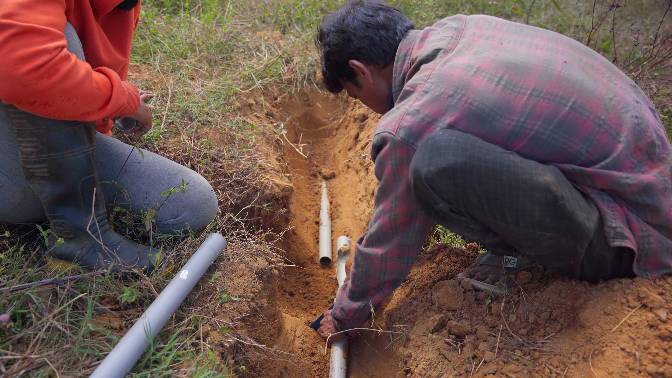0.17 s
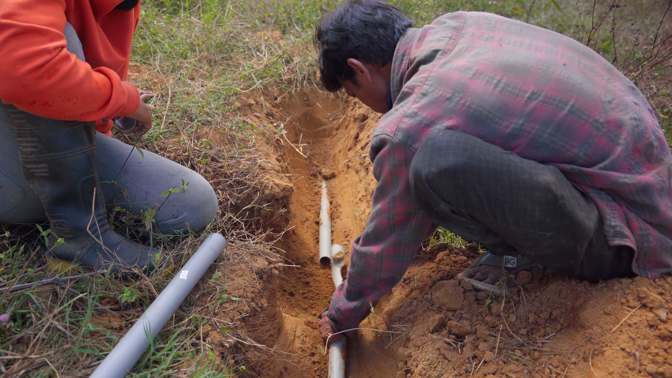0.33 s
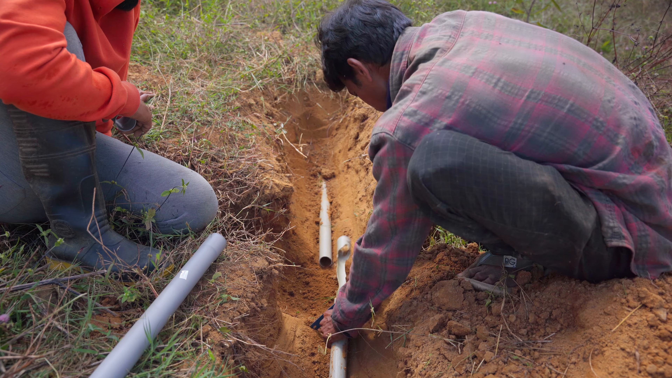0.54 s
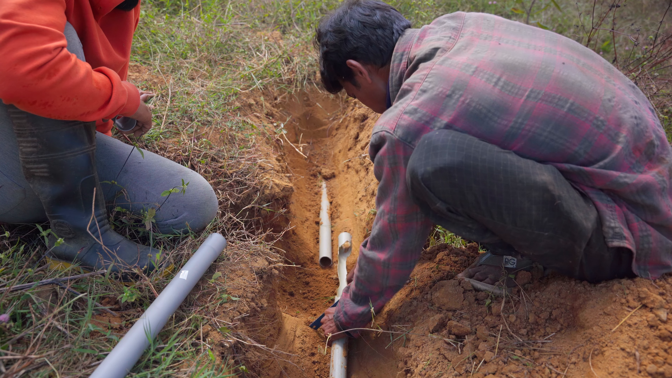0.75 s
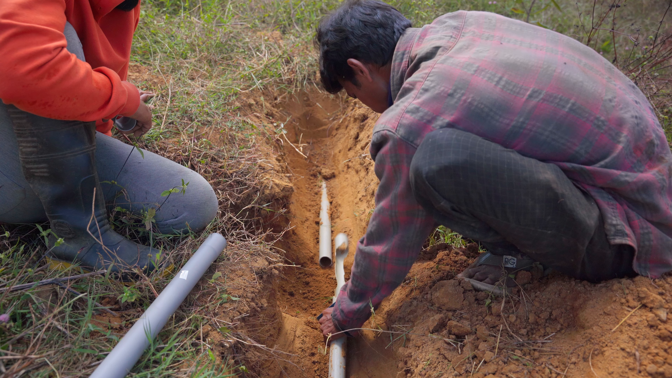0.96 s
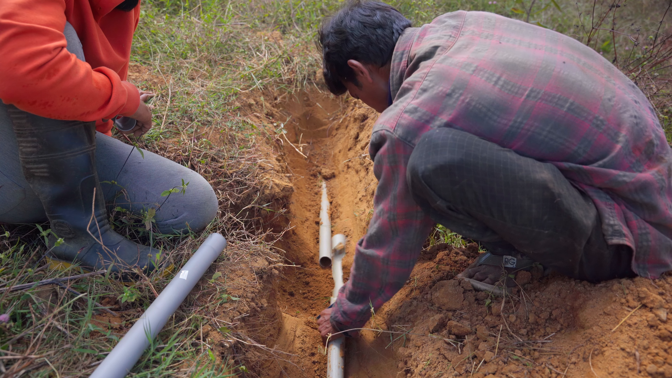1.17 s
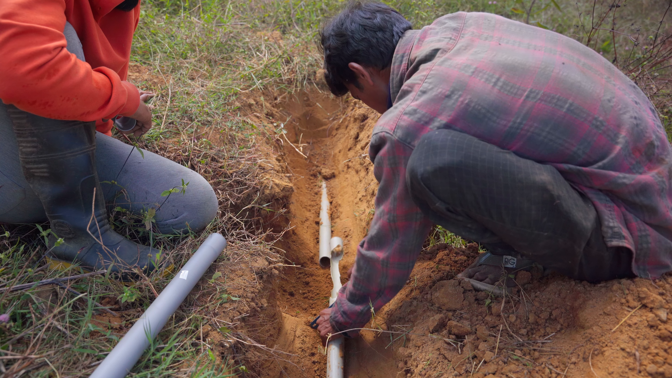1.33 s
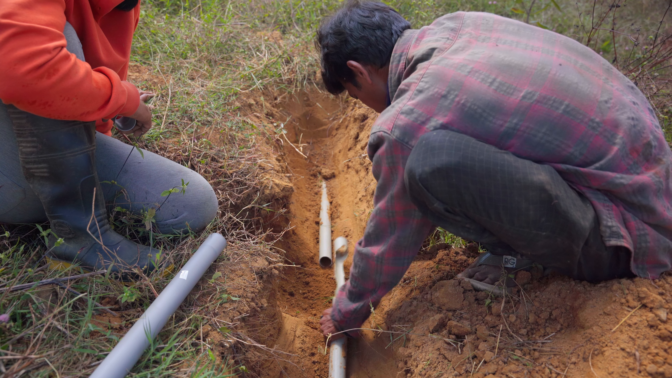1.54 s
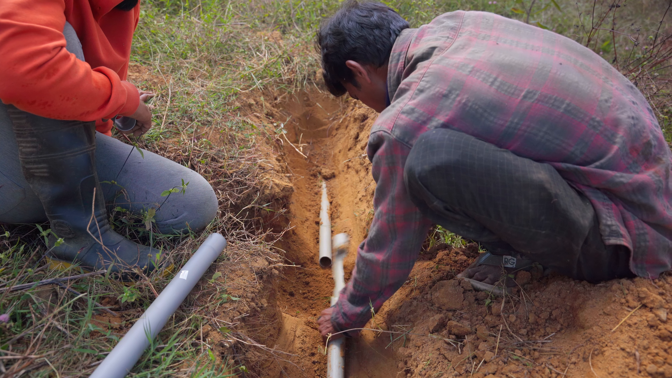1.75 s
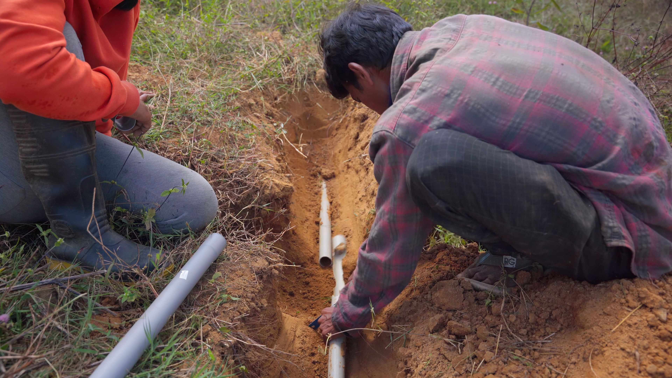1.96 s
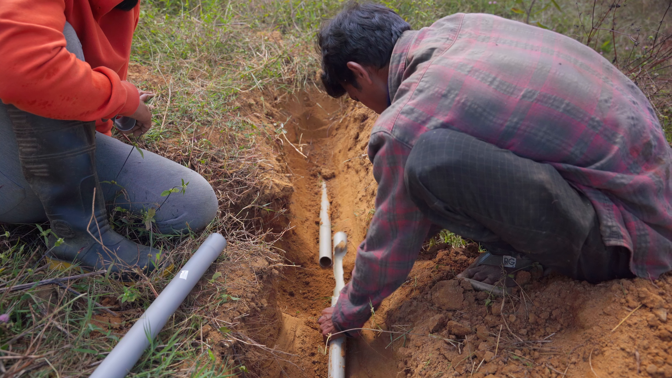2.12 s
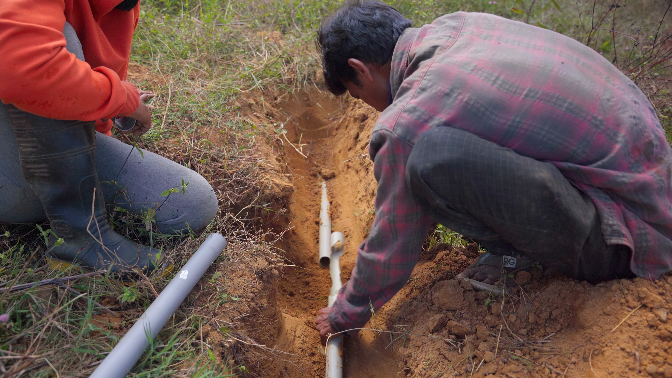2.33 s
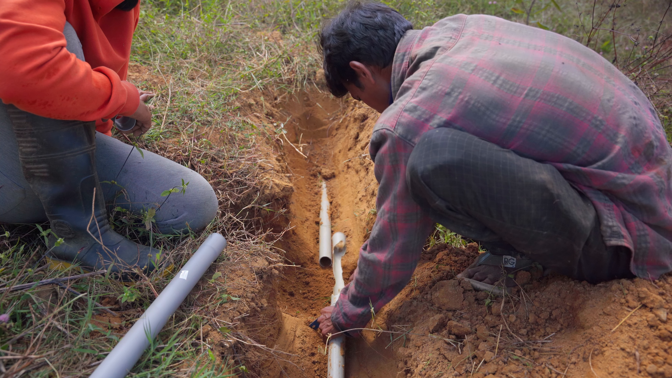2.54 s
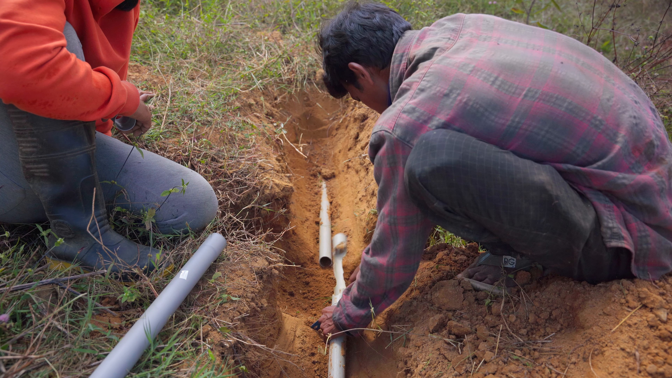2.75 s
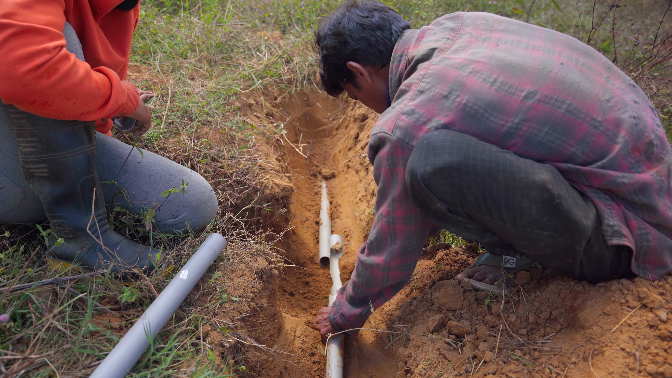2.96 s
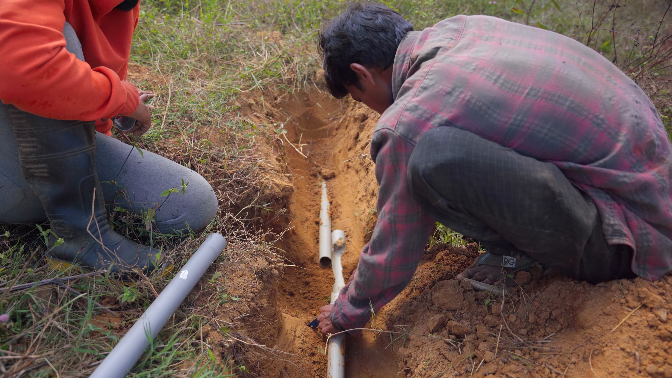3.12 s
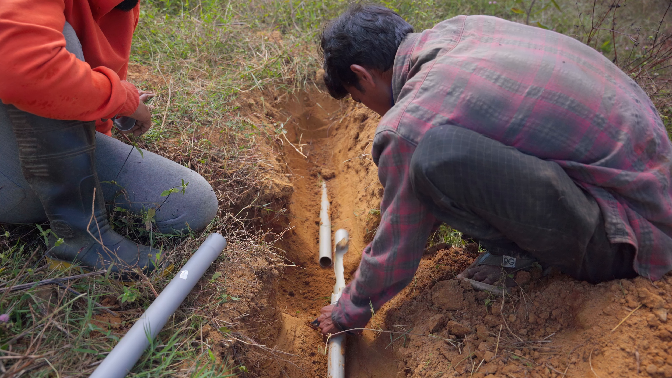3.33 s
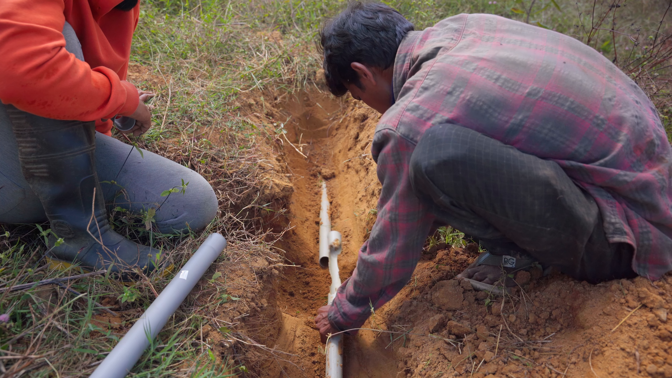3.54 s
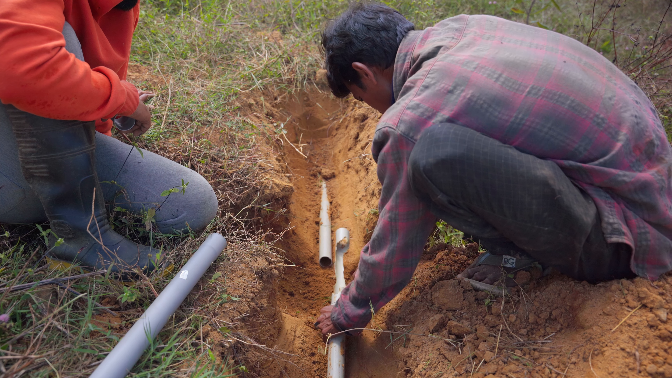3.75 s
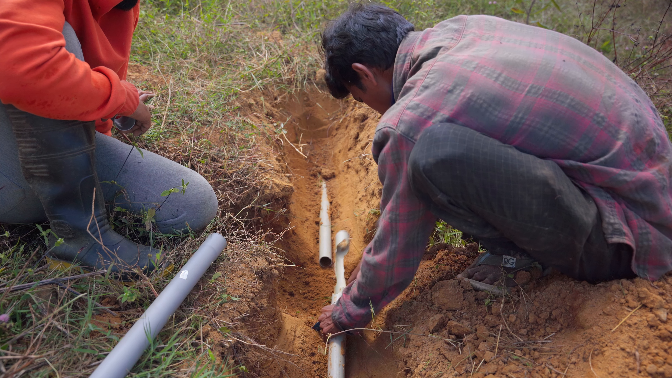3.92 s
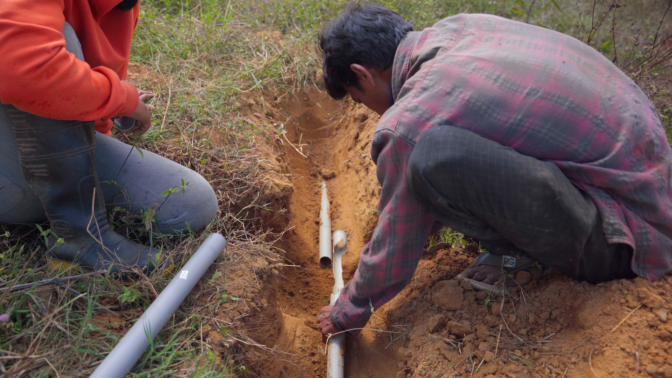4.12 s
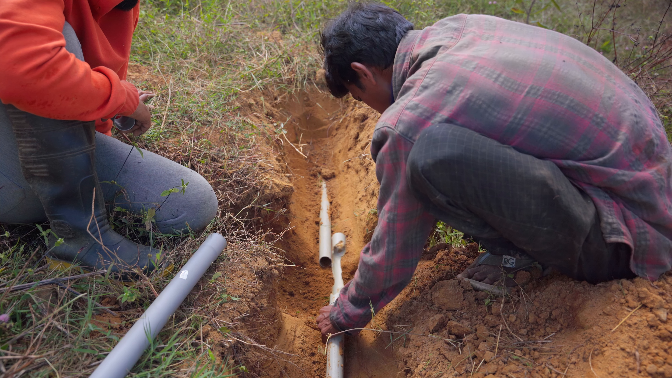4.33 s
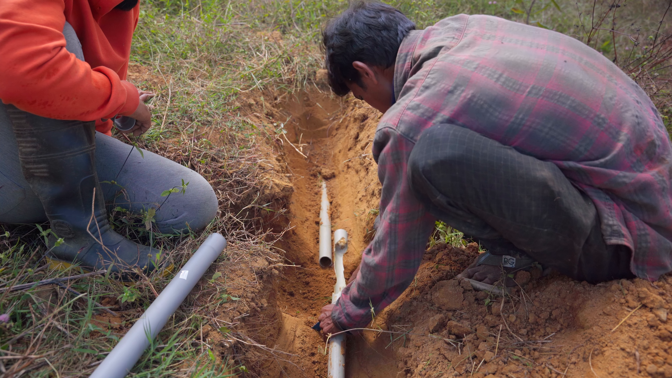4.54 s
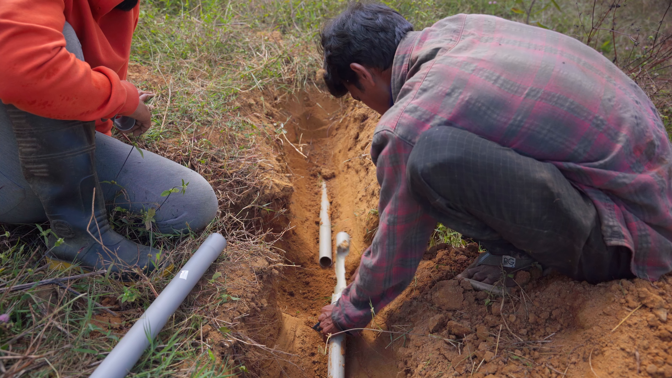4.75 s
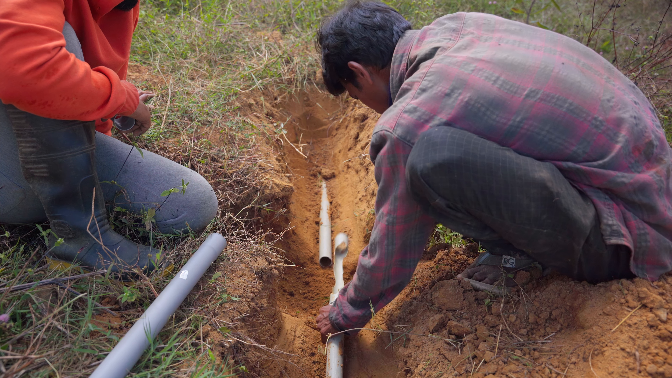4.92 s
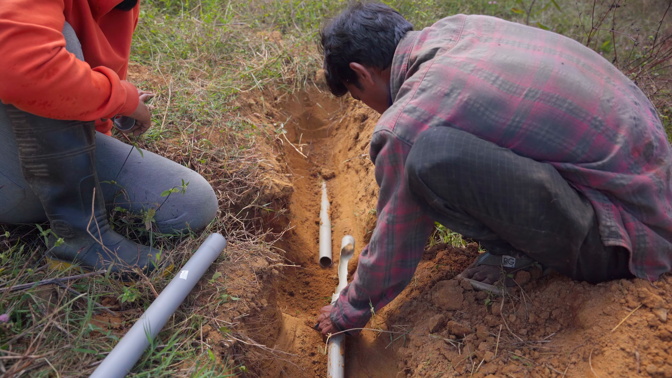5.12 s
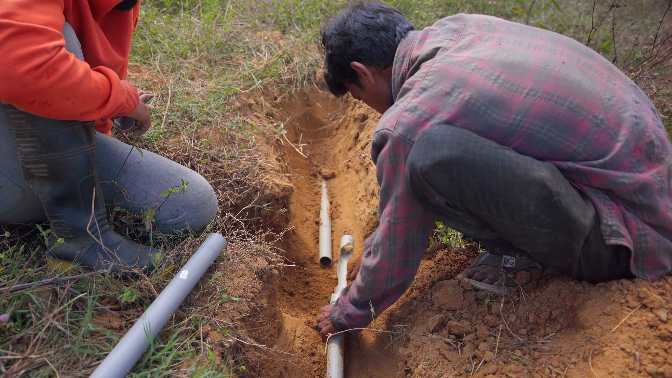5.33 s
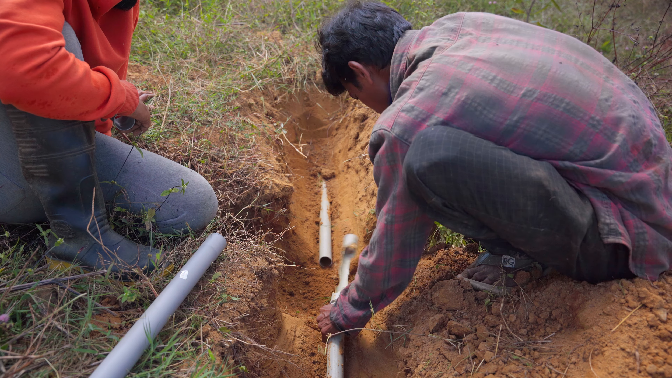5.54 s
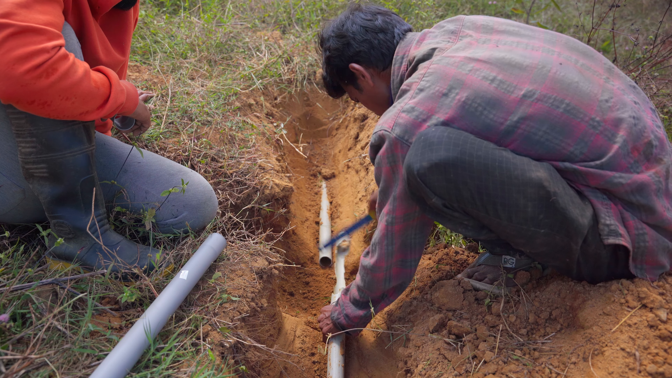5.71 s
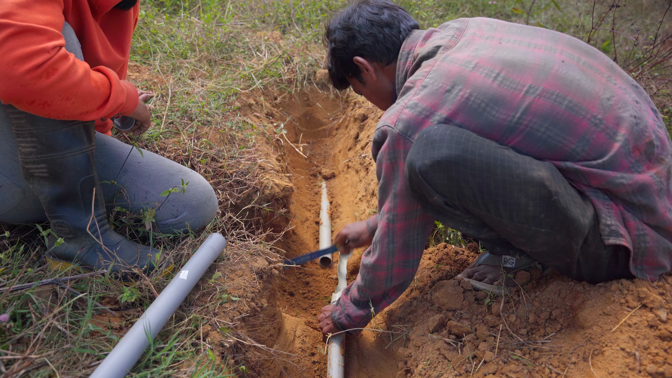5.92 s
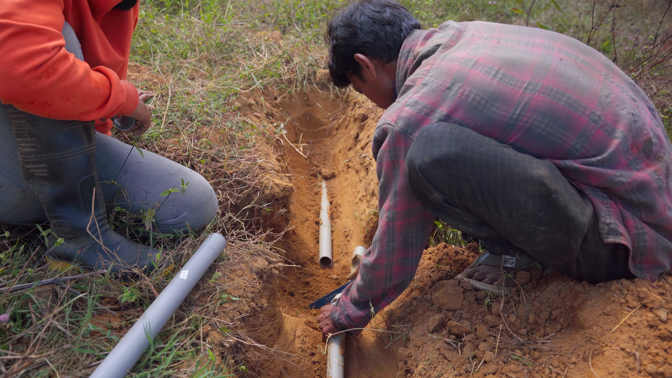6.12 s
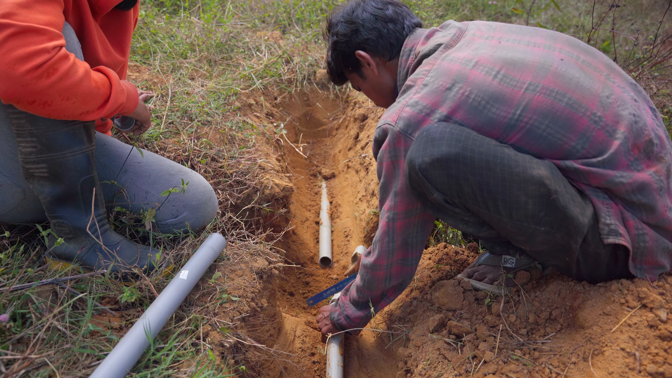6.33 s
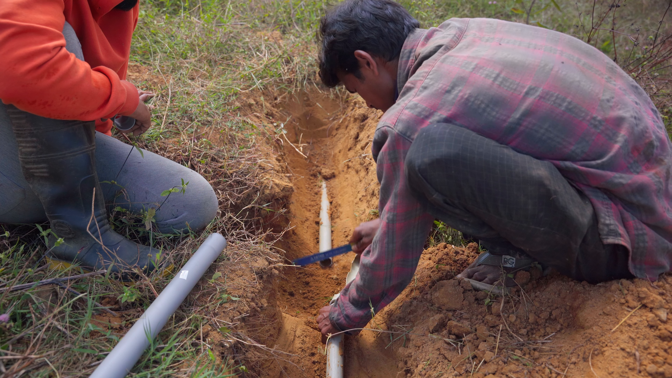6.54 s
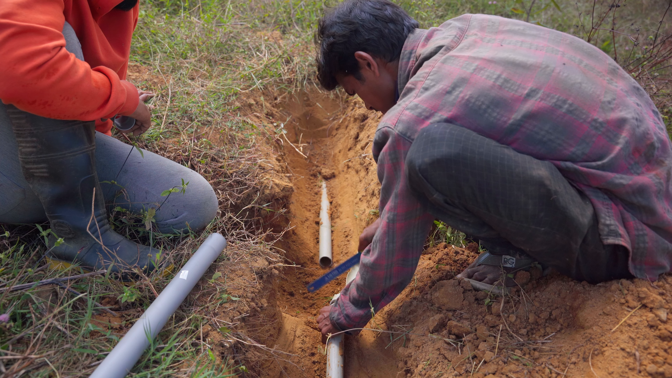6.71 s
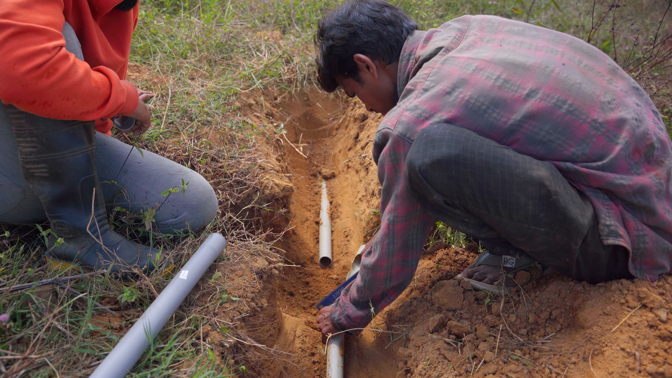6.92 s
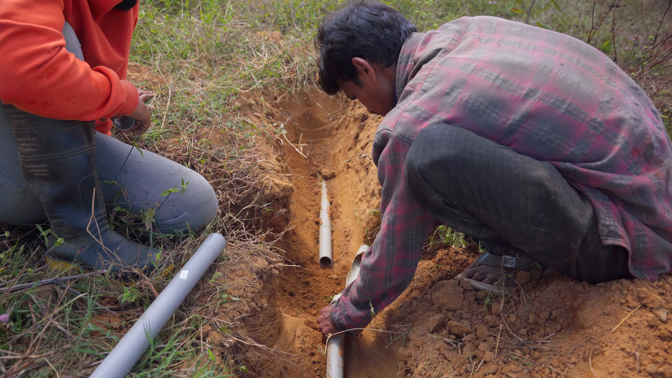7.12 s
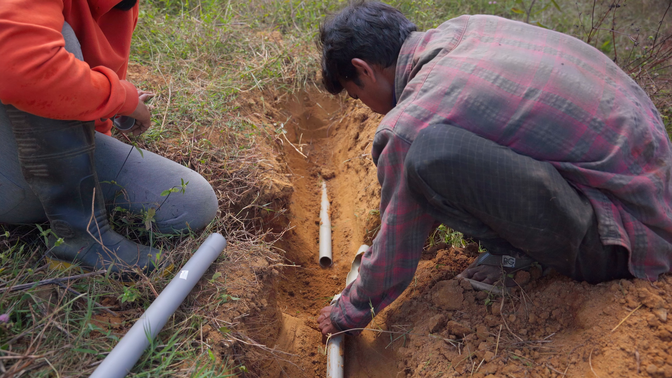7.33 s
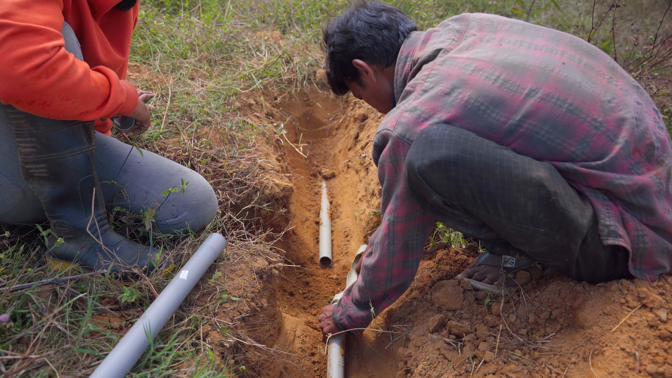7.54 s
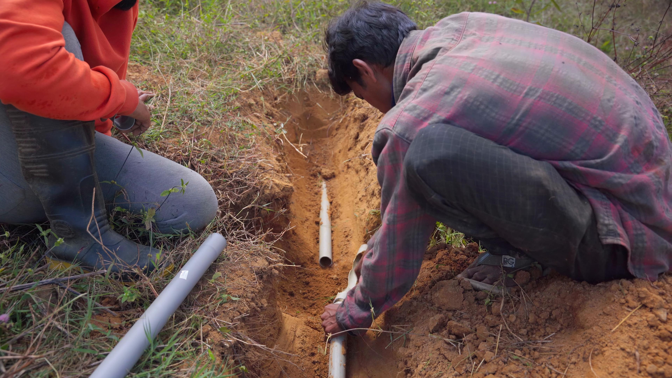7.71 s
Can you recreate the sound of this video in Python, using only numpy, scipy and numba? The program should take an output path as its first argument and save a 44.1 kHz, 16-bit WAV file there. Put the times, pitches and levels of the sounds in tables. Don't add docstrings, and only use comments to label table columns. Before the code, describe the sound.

Outdoors, close to a small camera microphone, a saw blade cuts a thin plastic pipe in brisk back-and-forth strokes, about seven a second counting both directions. Forward strokes are louder, with sharp cracks and snags. The sound begins hollow, grows fuller and ringing, then weakens as the blade comes free. A small knock, a faint bird whistle and light skimming scrapes follow over wind and hiss.

```python
import sys
import numpy as np
from scipy import signal
from scipy.fft import rfft, irfft
from scipy.io import wavfile
from scipy.ndimage import uniform_filter1d
from numba import njit

SR = 44100
rng = np.random.default_rng(int(sys.argv[2]) if len(sys.argv) > 2 else 0)


def gain_from_decibels(decibels):
    exponent = np.asarray(decibels, float) / 20
    return 10 ** exponent


def persist_wave(psi):
    counts = np.round(np.clip(psi, -1, 1) * 32767).astype(np.int16)
    wavfile.write(sys.argv[1], SR, np.atleast_2d(counts).T)


N = 342657
FFT_SIZE = 16384

# hz, level_db_per_hz
HISS_COLOUR = [(100, -16), (170, -1), (244, -9), (296, -7), (815, -14), (1370, -16), (2040, -24),
               (4920, -26.5), (5730, -25.5), (7210, -27), (11200, -28.5), (15200, -16.5), (16400, -32)]
# time_s, level_db
WIND_LEVEL = [(0.0, -54), (0.48, -50), (3.16, -51), (3.27, -53), (3.33, -43), (3.44, -52), (5.17, -53.5),
              (5.78, -47.5), (6.1, -53.5), (6.28, -42), (6.34, -55.5), (6.75, -40.5), (6.9, -47),
              (7.38, -49.5), (7.68, -50), (7.77, -48)]
# hz, level_db_per_hz
WIND_COLOUR = [(8.8, -35.5), (15, -3), (64, 3.5), (116, 3.5), (193, -18), (237, -15), (349, -25.5),
               (400, -21), (520, -70.5), (880, -120)]
# start_s, length_s, first_hz, last_hz, level_db
BIRD_CALLS = [
    (6.805, .018, 6200, 6000, -67),
    (6.835, .05, 5750, 4200, -61),
    (6.875, .035, 4800, 4550, -59),
    (6.885, .022, 11000, 8550, -61),
    (6.2, 0.034, 5400, 5350, -63),
]
# start_s, length_s, centre_hz, width_hz, level_db
RUSTLES = [(6.455, .03, 2240, 4400, -54), (6.27, 0.0235, 7500, 2300, -60.5),
           (0.207, 0.032, 4800, 4500, -46), (1.8, 0.061, 5000, 5000, -52), (0.542, 0.036, 3600, 6400, -47),
           (1.09, .03, 6000, 7000, -44), (1.35, .09, 5000, 7000, -52), (2.53, .06, 5000, 4000, -48),
           (4.0, .04, 5500, 500, -50), (5.53, .05, 5400, 200, -52), (7.245, .02, 5350, 300, -58),
           (1.7, 0.049, 4000, 7300, -46), (2.27, 0.04, 4800, 2640, -51), (6.36, 0.028, 1300, 2400, -50.5),
           (6.53, 0.15, 7600, 1400, -58), (7.4, 0.106, 4000, 900, -64), (4.12, .02, 4570, 460, -22)]
# time_s, peak_db, pitch_hz
GRIT_TICKS = [(.3797, -26, 5430), (.385, -28, 4500), (1.4264, -39, 5520), (3.165, -39, 5504),
              (3.177, -40, 4500), (3.4525, -34, 4993), (3.728, -41, 6005), (4.29, -35, 5987),
              (4.3083, -31, 4990), (4.565, -42, 5515), (5.5706, -40, 6000), (5.716, -51.5, 5800),
              (5.8227, -48, 5570), (5.9297, -49, 5193), (5.9504, -50.5, 5290), (5.9778, -45, 8120),
              (6.0297, -55.5, 5364), (6.2188, -44, 5360), (6.2396, -53, 4990), (6.2581, -51, 7960),
              (6.2766, -54, 6000), (6.3703, -48.5, 5400), (6.4647, -46, 5220), (7.003, -45, 5400),
              (7.0794, -53, 5270), (7.3005, -44, 8900), (7.3658, -49, 4380), (7.6291, -41.5, 5606)]

# pitch_hz, level_db, t60_s
DROP_MODES = [(240, -12, .04), (1000, -10, .015), (2070, 0, .014), (2374, -5, .02), (3112, -3, .012),
              (4750, -9, .012), (5300, -16, .04), (5895, -10, .02)]
# time_s, level_db
DROP_HITS = [
    (6.1236, -12),
    (6.1431, -27),
    (6.16, -32),
]

# hz, level_db_per_hz
PULL_COLOUR = [(71, -71), (120, -17), (262, -2), (429, -2.5), (674, -7.5), (1200, -2.5), (1630, -3.5),
               (2460, -6), (4030, -11), (5720, -13), (6740, -14), (7310, -13.5), (11500, -24), (14700, -21),
               (16300, -36)]
# hz, level_db_per_hz
PUSH_COLOUR = [(71, -69), (120, -25), (232, -1.5), (372, 3), (447, -6), (996, -1.5), (1570, -1), (2130, -2),
               (2840, -7), (5720, -10.5), (6880, -12.5), (8620, -15), (11300, -19.5), (14100, -18),
               (16300, -26)]
# hz, level_db_per_hz
SHALLOW_COLOUR = [(71, -62), (120, -24), (257, -10.5), (429, -5), (661, -7), (1040, -11), (1200, -11),
                  (2000, -8), (2840, -10), (3420, -10.5), (4560, -18), (5490, -10.5), (6470, -20.5),
                  (15000, -28), (16300, -44)]
# pitch_hz, width_hz, over_colour_db
WALL_RINGS = [(215, 30, 4), (2196, 110, 2), (5570, 50, 2), (5900, 900, 2), (8450, 300, 4), (14400, 40, 4)]
# pitch_hz, width_hz, over_colour_db
STRUCK_RINGS = [(2230, 500, 4), (3230, 400, 3), (5800, 900, 4), (8500, 700, -0.5)]
# pitch_hz, width_hz, level_db
LONG_RINGS = [(216, 12, -1), (484, 10, 6), (1012, 12, -7), (5560, 22, -12)]
# time_s, level_db
AIR_SEAL = [(0, -18.5), (.5, -10.5), (.9, -0.5), (1.7, 3), (2.3, -4), (3.4, -4.5), (4.3, -4.5), (5.5, -10),
            (7, -5.5)]
# pitch_hz, wander_share, width_hz, level_db
CHATTER_BANDS = [(750, .15, 180, -6), (2120, .09, 450, 0), (3300, .1, 500, -2), (5850, .1, 800, -2)]

# time_s, peak_db
PULL_CATCHES = [(.0052, -17.5), (0.2804, -11), (0.5817, -24), (0.595, -16), (0.8656, -20), (1.1489, -21),
                (1.177, -16), (1.3938, -18), (1.098, -33), (1.4631, -16), (1.7473, -21), (2.03, -15),
                (2.3104, -18), (2.3223, -26), (2.8859, -28), (3.2001, -13), (3.4839, -20), (3.4924, -18),
                (3.2387, -17), (4.1067, -14.5), (4.589, -23), (4.8804, -24), (4.8924, -23), (5.148, -29),
                (5.4081, -27)]
# time_s, peak_db
PUSH_CATCHES = [(0.09, -18), (4.4574, -20), (.3992, -18), (0.6924, -8), (0.708, -11), (0.972, -19),
                (0.9868, -14), (0.992, -11), (0.998, -3), (1.259, -5), (1.2699, -7), (1.5671, -8),
                (1.8477, 2), (1.856, -11), (2.1314, -3), (2.14, -2), (2.1456, -2), (2.4155, -20),
                (2.424, -6), (2.4382, -3.5), (2.443, -2), (2.7067, -31), (2.7142, -1), (3.0063, -4),
                (3.2915, -18), (3.301, -20), (3.3094, -3.5), (3.019, -5), (4.1717, -22), (4.1867, -9.5)]
# time_s, peak_db
JAMS = [(0.1298, -4.5), (0.1558, -10), (.169, -14), (0.445, -9), (.456, -9.5), (0.4684, -6), (0.485, -12),
        (0.5049, -9.5), (0.6578, -9.5), (0.7473, -2.5), (0.7747, -7), (0.7888, -11.5), (1.3194, -2),
        (1.651, -12), (1.872, -10), (1.933, -2.5), (2.763, -6.5), (2.802, -10), (3.414, -7), (3.5361, -6),
        (4.128, -10), (4.2541, 0.5), (4.487, -16), (5.0324, -18.5), (5.0794, -11.5), (5.1786, -17),
        (5.353, -19.5), (5.4683, -17)]
# treble_db, bass_db
CATCH_COLOURS = [
    (-15.5, -1.5),
    (-5, -9.5),
    (-1.5, -9.5),
]
# time_s, peak_db, treble_db, bass_db
KNOCKS = [(5.5291, -35.5, 10.5, -14), (5.589, -22, 2.5, 0), (5.613, -35, -5, -9), (6.1151, -37, 14, 7),
          (6.124, -13, 9.5, -3), (6.1441, -33, 0, 4), (6.161, -28, -1, 3), (6.18, -31.5, 7, 9.5),
          (6.3509, -40, -38, 14.5), (7.006, -41, -8, 0), (7.0404, -24, -6, -5), (7.0446, -24.5, -11, -7),
          (7.0514, -26, -5, 4), (7.068, -38, -1, -1), (7.4055, -35, -18, 1), (7.5267, -46, -15, 3),
          (7.7386, -22, -13, -2), (7.755, -32, -13, -7)]
# time_s, peak_db
TOOTH_SNAPS = [(0.0053, -14), (0.144, -5), (0.38, -22.5), (0.425, 1), (0.436, -5), (0.4883, -9),
               (0.6526, -5), (0.733, -4), (0.7381, -3), (0.7522, -4), (0.7555, -5), (1.0179, -1),
               (1.037, -2), (1.0403, -3), (1.0564, -6.5), (1.1879, -7), (1.2017, -4), (1.2901, -2),
               (1.2996, 0), (1.308, -3), (1.4683, -10), (1.5934, -1), (1.5968, -1.5), (1.6089, -3),
               (1.621, -3), (1.7858, -10), (1.8096, -10), (1.8933, -1), (2.079, -6), (2.1766, -2.5),
               (2.1873, -2.5), (2.2133, -3), (2.3103, -19), (2.3473, -10), (2.3736, -6), (2.4712, -4),
               (2.5033, -5), (2.7306, -9), (2.7582, -1), (2.785, -10), (2.9519, -8), (2.9611, -5),
               (3.0309, -7), (3.0566, -7), (3.322, 1), (3.334, -8), (3.4922, -14), (3.6307, -1),
               (3.6466, -2), (3.8064, -11), (3.8258, -3), (3.8944, -14), (4.2374, -7), (4.5031, -5),
               (4.6822, -8), (4.755, -11), (4.7949, -5), (4.8926, -16), (4.977, -12), (5.4455, -19)]

# start_s, length_s, top_speed_place (0-1), level_db, brightness_db
PULLS = [(-0.009, 0.089, 0.28, -31, -4.5), (.274, 0.092, 0.48, -23, 0), (.568, .11, .61, -24.5, -0.5),
         (.857, .12, 0.43, -22, -0.5), (1.127, .11, 0.69, -21, 2.5), (1.461, 0.099, 0.26, -27.5, 0),
         (1.738, 0.099, 0.49, -25.5, 3), (2.02, .11, 0.47, -26.5, 1.5), (2.301, .11, 0.54, -24, 2),
         (2.583, .11, 0.57, -21.5, 0), (2.88, .12, 0.53, -21, 2.5), (3.194, .1, 0.47, -20.5, 2.5),
         (3.474, .11, 0.55, -22.5, 3), (3.756, .12, .48, -26, 3.5), (4.014, .15, 0.59, -24.5, 2.5),
         (4.309, 0.12, 0.59, -27, 4), (4.575, 0.15, 0.5, -28, 3.5), (4.856, .16, 0.5, -28.5, 6),
         (5.126, .15, 0.62, -26.5, 4.5), (5.387, 0.16, 0.52, -33.5, 4)]
# start_s, length_s, top_speed_place (0-1), level_db, brightness_db
PUSHES = [(.085, 0.099, 0.46, -20, -4), (.393, 0.14, 0.28, -19.5, -6), (.682, .12, 0.54, -17.5, -4),
          (.95, .12, 0.67, -14, -3), (1.249, 0.093, 0.59, -15.5, -0.5), (1.546, .12, 0.53, -16, 0),
          (1.841, .12, 0.49, -18.5, 1.5), (2.116, .12, 0.6, -15.5, 0.5), (2.407, .12, 0.6, -16, -0.5),
          (2.681, .14, 0.57, -17, -2), (2.992, .14, 0.36, -18, -1.5), (3.286, .15, 0.48, -17.5, -0.5),
          (3.562, .15, .59, -20, -1.5), (3.856, 0.13, .61, -22, 0), (4.147, .13, 0.69, -19, 1),
          (4.404, .15, 0.66, -23, 0), (4.695, .14, 0.63, -23, 0.5), (4.986, 0.14, 0.52, -28, -0.5),
          (5.255, 0.13, 0.55, -31, 0.5)]
# start_s, length_s, level_db, bass_db, treble_db
LOOSE_STROKES = [
    (5.6, 0.03, -63, 9.5, 13),
    (6.1, .08, -47, 7, 6.5),
    (7.06, 0.26, -51, -4, -6),
    (7.33, 0.165, -47, -12, -6),
    (7.5, .16, -39, -1, 3),
    (7.725, 0.062, -41, -0.5, 1),
]
# start_s, length_s, dip_db
HANGS = [(0.287, 0.0042, -14), (0.402, 0.0011, -12), (0.443, 0.0014, -16), (0.4535, 0.0021, -9),
         (0.459, 0.0083, -25.5), (0.4765, 0.0053, -16.5), (0.4995, 0.0046, -19), (0.597, 0.003, -11),
         (0.603, 0.0016, -10), (0.699, 0.0063, -19), (0.7115, 0.0016, -13), (0.7592, 0.0026, -12),
         (0.7645, 0.0044, -9), (0.7777, 0.0086, -9), (0.8693, 0.0085, -15), (0.924, 0.0028, -10),
         (0.9652, 0.0031, -14), (0.987, 0.0035, -18), (0.9932, 0.0019, -12), (1.159, 0.0052, -11),
         (1.2426, 0.0026, -21), (1.263, 0.0059, -21), (1.281, 0.0032, -10), (1.3178, 0.0021, -13),
         (1.5418, 0.0077, -21), (1.752, 0.0018, -15), (1.851, 0.0036, -16), (1.861, 0.0026, -14),
         (1.926, 0.0051, -22), (2.116, 0.0061, -24), (2.1344, 0.0041, -18), (2.1428, 0.0026, -11),
         (2.315, 0.0041, -9), (2.4193, 0.0039, -23), (2.4319, 0.0048, -21), (2.4562, 0.0028, -12),
         (2.4975, 0.003, -10), (2.7607, 0.002, -10), (2.7925, 0.0064, -16), (2.9896, 0.0122, -22),
         (3.0098, 0.0082, -10), (3.0344, 0.0029, -14), (3.202, 0.0099, -7), (3.29, 0.0049, -18),
         (3.304, 0.0039, -15), (3.319, 0.0033, -12), (3.5766, 0.01, -18), (3.6336, 0.0026, -3),
         (3.642, 0.0024, -9), (3.839, 0.002, -11), (4.1162, 0.0041, -18), (4.1749, 0.0093, -13),
         (4.1819, 0.001, -16), (4.1886, 0.0099, -6), (4.2458, 0.006, -10), (4.6, 0.0034, -8),
         (5.347, 0.0037, -6)]

USUAL_BASS_DB, USUAL_TREBLE_DB = -9, -6
DEEPENS_S = (1.2, 2.6)


def unit(x):
    return x / np.sqrt(np.mean(x ** 2))


def response(spectrum, rings=()):
    hz = np.maximum(np.arange(FFT_SIZE // 2 + 1) * SR / FFT_SIZE, 1)
    at_hz, db = np.transpose(spectrum)
    gain = gain_from_decibels(np.interp(np.log(hz), np.log(at_hz), db))
    for centre, width, ring_db in rings:
        gain = gain * np.sqrt(1 + (gain_from_decibels(ring_db) ** 2 - 1) / (1 + (2 * (hz - centre) / width) ** 2))
    cepstrum = irfft(np.log(gain))
    cepstrum[1:FFT_SIZE // 2] *= 2
    cepstrum[FFT_SIZE // 2 + 1:] = 0
    h = irfft(np.exp(rfft(cepstrum)))
    return h / np.sqrt(np.sum(h ** 2))


def ring(x, h):
    return signal.fftconvolve(x, h)[:N]


def first_order(x, hz, kind):
    return signal.lfilter(*signal.butter(1, hz, kind, fs=SR), x)


def tilt(x, bass_db, treble_db, wall_db=0):
    low = first_order(x * (gain_from_decibels(bass_db) - 1), 600, "low")
    high = first_order(x * (gain_from_decibels(treble_db) - 1), 4000, "high")
    wall = first_order(x * (gain_from_decibels(wall_db) - 1), [1300, 2600], "band")
    return x + low + high + wall


def walk(rate_hz):
    hold = int(SR / rate_hz)
    steps = np.repeat(rng.standard_normal(N // hold + 1), hold)
    return unit(uniform_filter1d(uniform_filter1d(steps, hold), hold)[:N])


def bursts(impulses, decay_s):
    fade = signal.lfilter([1], [1, -np.exp(-1 / (decay_s * SR))], impulses)
    return fade * rng.standard_normal(N)


@njit
def resonance(x, tune, damp):
    out, band, low = np.empty(len(x)), 0., 0.
    for i in range(len(x)):
        g = tune[i]
        v = (band + g * (x[i] - low)) / (1 + g * (g + damp))
        band = 2 * v - band
        low = low + 2 * g * v
        out[i] = damp * v
    return out


def field():
    gust_db = np.interp(np.arange(N) / SR, *np.transpose(WIND_LEVEL)) - 1.5 + 2.5 * walk(9)
    wind = unit(ring(rng.standard_normal(N), response(WIND_COLOUR))) * gain_from_decibels(gust_db)
    hiss = unit(ring(rng.standard_normal(N), response(HISS_COLOUR)))
    return wind + hiss * gain_from_decibels(-53 + .7 * walk(2.9935))


def bird():
    out = np.zeros(N)
    for start, length, first_hz, last_hz, db in BIRD_CALLS:
        i, n = int(start * SR), int(length * SR)
        phase = 2 * np.pi * np.cumsum(np.linspace(first_hz, last_hz, n)) / SR
        out[i:i + n] += gain_from_decibels(db) * np.sqrt(np.hanning(n)) * np.sin(phase)
    return out


def rustles():
    out = np.zeros(N)
    for start, length, hz, width_hz, db in RUSTLES:
        i, n = int(start * SR), int(length * SR)
        band = signal.butter(2, [hz - width_hz / 2, hz + width_hz / 2], "band", fs=SR)
        hiss = signal.lfilter(*band, rng.standard_normal(n))
        out[i:i + n] += gain_from_decibels(db) * np.sqrt(np.hanning(n)) * unit(hiss)
    return out


def ticks(decay_s=0.0011, rough=0.9):
    out, t = np.zeros(N), np.arange(400) / SR
    for s, db, hz in GRIT_TICKS:
        grit = np.diff(rng.standard_normal(len(t) + 1)) / 2
        grain = np.sin(2 * np.pi * hz * t) + rough * grit
        out[int(s * SR):int(s * SR) + len(t)] += gain_from_decibels(db) * np.exp(-t / decay_s) * grain
    return out


def drop(rise_s=0.00023):
    out, t = np.zeros(N), np.arange(SR // 10) / SR
    body = np.zeros(len(t))
    for hz, db, t60 in DROP_MODES:
        body += gain_from_decibels(db - 60 * t / min(t60, .08)) * np.sin(2 * np.pi * hz * t)
    for s, db in DROP_HITS:
        out[int(s * SR):int(s * SR) + len(t)] += gain_from_decibels(db) * (1 - np.exp(-t / rise_s)) * body
    return out


def air_column(force):
    t, out = np.arange(N) / SR, np.zeros(N)
    seal_db = np.interp(t, *np.transpose(AIR_SEAL))
    for hz, width_hz, db in LONG_RINGS:
        if hz < 2000:
            db = db + seal_db
        if 800 < hz < 2000:
            db = db + 16 * (t > 7)
        out += signal.lfilter(*signal.iirpeak(hz, hz / width_hz, fs=SR), force * gain_from_decibels(db))
    return out


def snag_rows():
    rows = list(KNOCKS)
    for table, colour in zip((PULL_CATCHES, PUSH_CATCHES, JAMS), CATCH_COLOURS):
        rows += [(s, db, *colour) for s, db in table]
    return sorted(rows)


def snags(crack_s=0.0014, trim_db=6.0, crackle=0.32, snap_db=7):
    s, db, treble_db, bass_db = np.transpose(snag_rows())
    at = (s * SR).astype(int)
    releases, snaps = np.zeros((2, N))
    releases[at] = gain_from_decibels(np.minimum(db, -2) + trim_db)
    snap_s, peak_db = np.transpose(TOOTH_SNAPS)
    snaps[(snap_s * SR).astype(int)] = gain_from_decibels(peak_db + snap_db)
    latest = np.maximum(np.searchsorted(at, np.arange(N), "right") - 1, 0)
    crack = 0.75 * releases + crackle * bursts(releases, crack_s)
    crack = tilt(crack, (bass_db - USUAL_BASS_DB)[latest], (treble_db - USUAL_TREBLE_DB)[latest])
    blow = first_order(crack + snaps, [500, 12000], "band")
    wall = ring(blow, response(PUSH_COLOUR, STRUCK_RINGS))
    return wall + air_column(wall)


def strokes():
    rows = []
    for table, bass_db, treble_db, push in [(PULLS, -10.5, -5.5, 0), (PUSHES, -9, -3.5, 1)]:
        for s, length, top, db, bright in table:
            rows.append((s, length, top, db, bass_db - 1.25 * bright, treble_db + bright, push))
    for k, (s, length, db, bass_db, treble_db) in enumerate(LOOSE_STROKES):
        rows.append((s, length, .68, db, bass_db, treble_db, 1 - k % 2))
    return rows


def motion(teeth_per_stroke=58):
    speed, rest = np.zeros(N), np.zeros((5, N))
    t = np.arange(N) / SR
    for start, length, top, db, bass_db, treble_db, push in strokes():
        inside = (t > start) & (t < start + length)
        bend = np.log(.5) / np.log(np.clip(top, .1, .9))
        now = np.sin(np.pi * ((t[inside] - start) / length) ** bend)
        where = np.flatnonzero(inside)[now > speed[inside]]
        speed[inside] = np.maximum(now, speed[inside])
        top_rate = teeth_per_stroke / length * np.pi / 2
        settings = [top_rate, db, bass_db - USUAL_BASS_DB, treble_db - USUAL_TREBLE_DB, push]
        rest[:, where] = np.array(settings)[:, None]
    return speed, *rest


def stall(extra_db=0.5, slew_s=.0007):
    db = np.zeros(N)
    for s, length, dip_db in HANGS:
        db[int(s * SR):int((s + length) * SR)] = min(dip_db + extra_db, 0)
    return gain_from_decibels(uniform_filter1d(db, int(slew_s * SR)))


def chatter(force):
    out, since = force, np.arange(N) / SR - 1.6
    sag = np.exp(-np.minimum(.055 * since, .2))
    damping_db = -1.2 * np.maximum(since, 0)
    for hz, wander, width_hz, db in CHATTER_BANDS:
        flare_db = db + damping_db + 3.5 * walk(60)
        tune = np.tan(np.pi * hz * sag * np.exp(wander * walk(16)) / SR)
        out = out + resonance(force * gain_from_decibels(flare_db), tune, width_hz / hz)
    return out


def tooth_force(speed, top_rate, skim, thud=0.29, bite_s=0.00077):
    travel = np.cumsum(speed * top_rate) / SR
    uneven, strength = rng.standard_normal((2, N // 20))
    place = np.cumsum(1 + .2 * np.clip(uneven, -3, 3))
    bites = np.zeros(N + 1)
    np.add.at(bites, np.searchsorted(travel, place), gain_from_decibels(3.2 * strength))
    fast = speed > .7
    tearing = bursts(bites[:N], bite_s)
    shove = first_order(bites[:N], [300, 1500], "band")
    force = tearing / tearing[fast].std() + thud * shove / shove[fast].std()
    return force + (1.0 - .65 * speed + 1.2 * skim) * rng.standard_normal(N)


def pipe_wall(force, push):
    t = np.arange(N) / SR
    deep = np.interp(t, DEEPENS_S, (0, np.pi / 2))
    hollow = np.interp(t, (0, DEEPENS_S[0]), (.8, 0))
    pulled, pushed = force * (1 - push), force * push
    shallow = ring(pulled * np.cos(deep) + pushed * hollow, response(SHALLOW_COLOUR, WALL_RINGS))
    full_pull = ring(pulled * np.sin(deep), response(PULL_COLOUR, WALL_RINGS))
    full_push = ring(pushed * (1 - hollow), response(PUSH_COLOUR, WALL_RINGS))
    return shallow + full_pull + full_push


def saw(skim_db=6.0, dull_db=-7, trim_db=-3.0, tail_db=-40, tail_s=0.022, judder_db=1.6, patchy_db=1.5):
    speed, top_rate, db, bass_db, treble_db, push = motion()
    t = np.arange(N) / SR
    skim = t >= 7
    skim[7 * SR] = False
    force = tooth_force(speed, top_rate, skim)
    depth = np.where(skim, speed ** 1.4, np.tanh(2.3 * speed ** 2.0) / np.tanh(2.3))
    level_db = db + trim_db - 8.5 * skim + judder_db * (1 - 0.5 * skim) * walk(140)
    force = force * depth * stall() * gain_from_decibels(level_db)
    force = force + gain_from_decibels(tail_db) * bursts(np.abs(force), tail_s) / np.sqrt(tail_s * SR)
    bass_db = bass_db + patchy_db * walk(60)
    treble_db = treble_db + dull_db * (1 - speed) + patchy_db * walk(90)
    force = tilt(force, bass_db, treble_db, patchy_db * walk(45) + skim_db * skim)
    force = chatter(force)
    tooth_hz = np.maximum(.95 * speed * top_rate, 200)
    sing = gain_from_decibels(1) * (np.interp(t, DEEPENS_S, (1, 0)) * (1 - push) + skim)
    force = force + resonance(force * sing, np.tan(np.pi * tooth_hz / SR), .22)
    wall = pipe_wall(force, push)
    return wall + air_column(wall)


def scene():
    background = field() + bird() + rustles() + ticks()
    return (background + drop() + snags() + saw())[None]


def band_limit(x):
    return signal.sosfilt(signal.butter(12, 16680, fs=SR, output="sos"), x)


def record(dry):
    top_cut = signal.ellip(8, .2, 60, 15900, fs=SR, output="sos")
    rounded = np.tanh(1.05 * dry) / 1.05
    return band_limit(signal.sosfilt(top_cut, rounded))


dry = scene()
out = record(dry)
persist_wave(out)
```